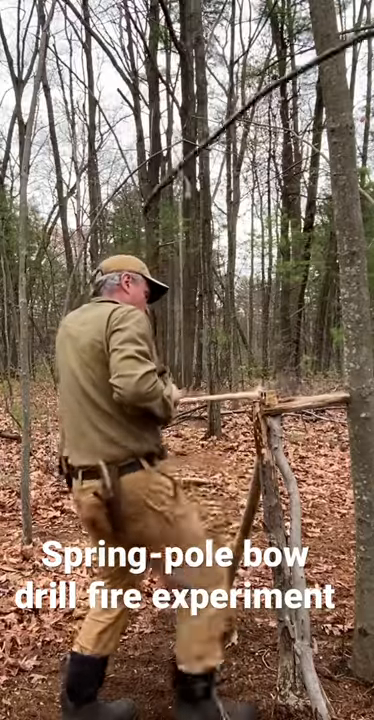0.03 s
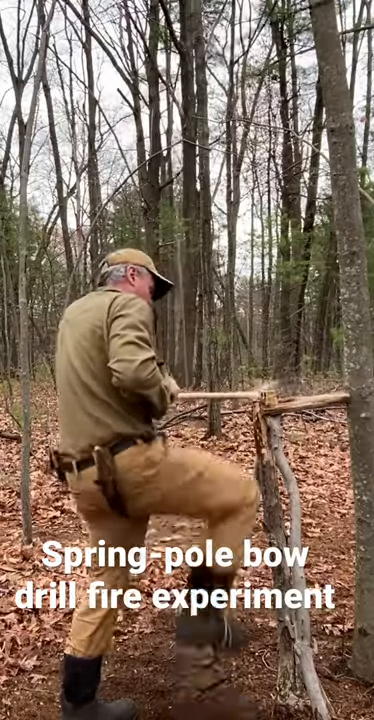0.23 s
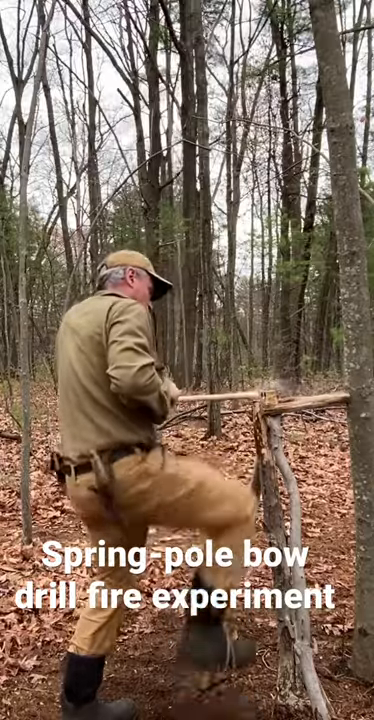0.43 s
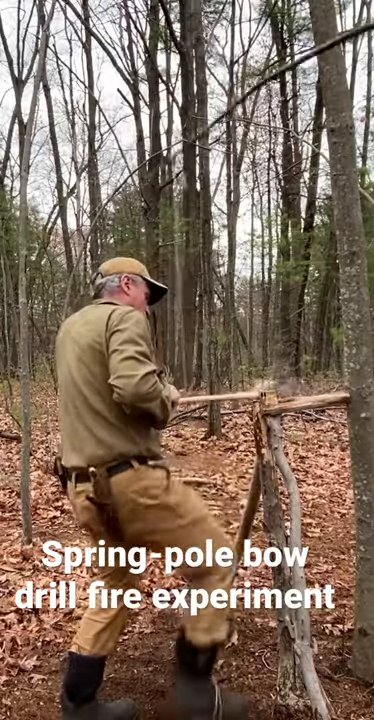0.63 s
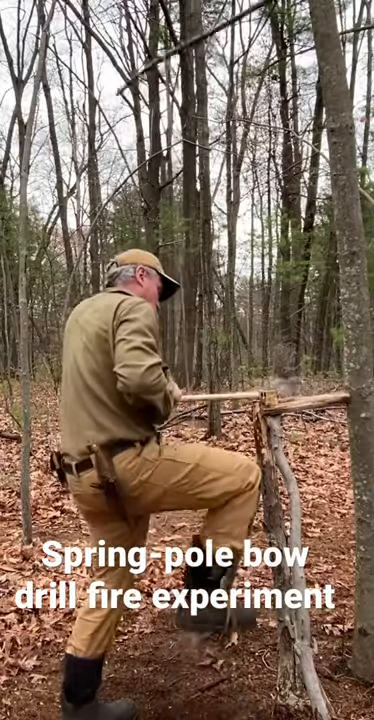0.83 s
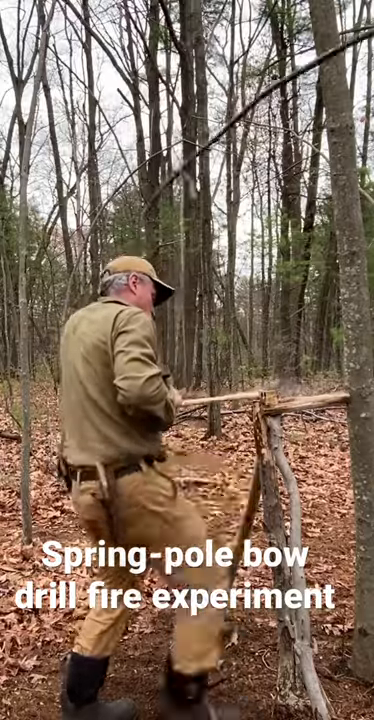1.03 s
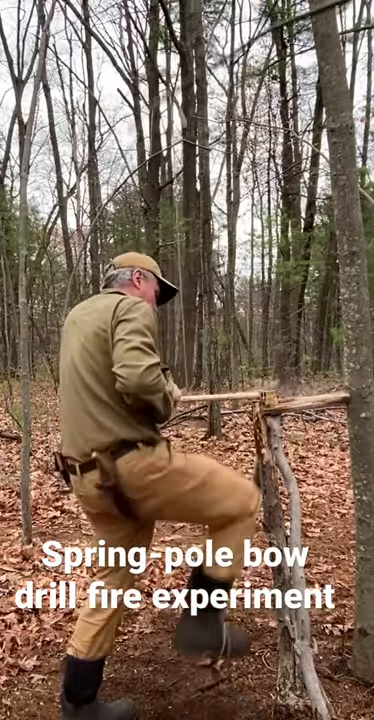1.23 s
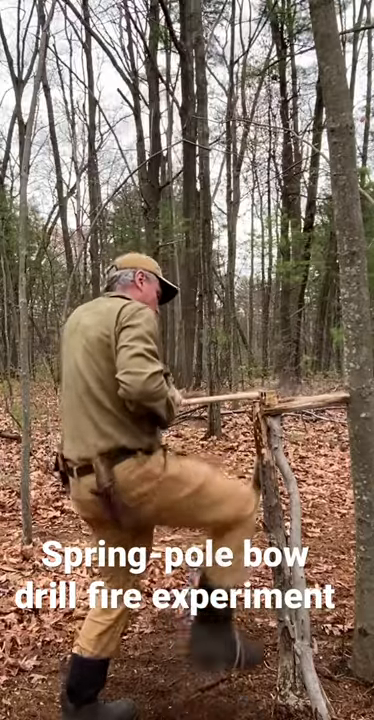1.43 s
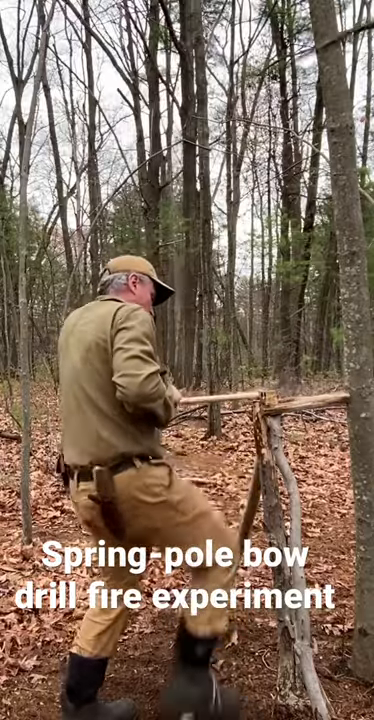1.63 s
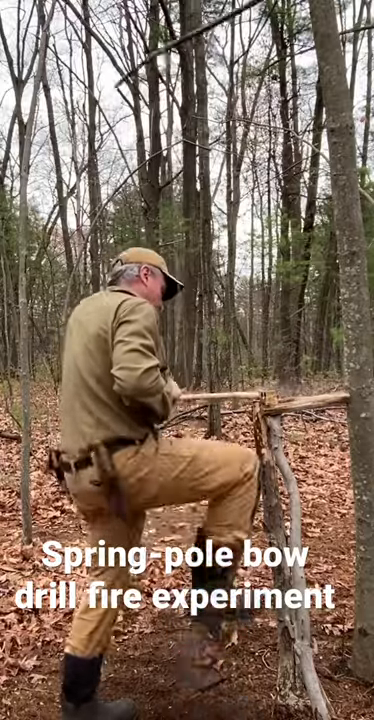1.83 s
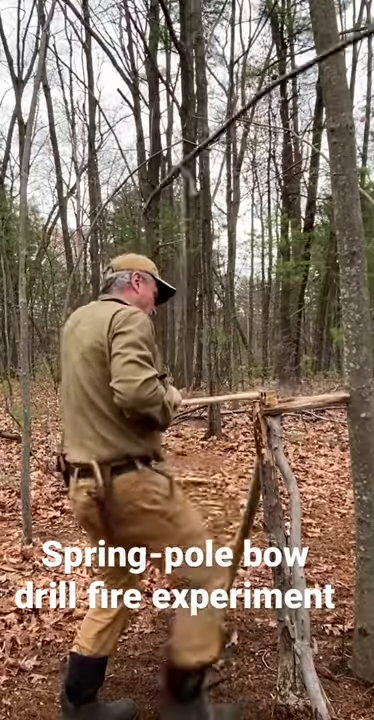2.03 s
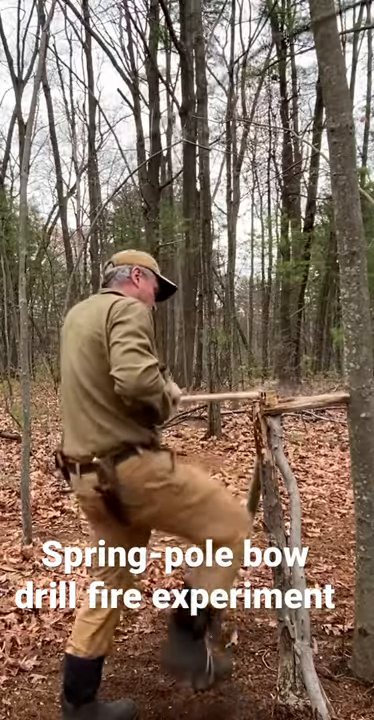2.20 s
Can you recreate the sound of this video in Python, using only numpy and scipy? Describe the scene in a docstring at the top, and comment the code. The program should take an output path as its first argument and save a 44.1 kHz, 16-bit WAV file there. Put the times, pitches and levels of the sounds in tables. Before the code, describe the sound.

Rhythmic dry wood-on-wood squeaks with hiss, cord ticks and soft boot thuds in quiet woods

```python
"""Nine short squeaks of wood on wood, each in a hiss, with small clicks and soft thuds over a far low hum.
A wooden spindle, spun back and forth by a foot-driven cord, rubs against a board in a wood.
Squeaks are stacks of unsteady partials (tones near whole or half multiples of the slip rate) with grit.
Hiss, cord ticks and the wash of traffic and trees are shaped noise; boot thuds are short falling tones.
The traffic hum is two wavering tones with a narrow band of rumble."""
import sys
import numpy as np
from scipy import signal
from scipy.fft import rfft, irfft
from scipy.io import wavfile
from scipy.ndimage import uniform_filter1d

SR = 44100
rng = np.random.default_rng(int(sys.argv[2]) if len(sys.argv) > 2 else 0)


def dump(signal):
    """Clip the signal to [-1, 1] and save it as 16-bit WAV at the path in sys.argv[1]."""
    limited = np.clip(np.atleast_2d(signal).T, -1, 1)
    pcm = np.round(limited * 32767).astype(np.int16)
    wavfile.write(sys.argv[1], SR, pcm)


N = 99886  # length in samples

# how far the left side leads the right for the hiss and the ticks: f/Hz, lead/rad
TREBLE_PHASE = [(0, -20), (9000, 2), (11800, 0.3), (12800, -2.9), (16400, -2)]


def amp(db):
    """Turn decibels into a plain factor."""
    return 10 ** (np.asarray(db) / 20)


def even(x):
    """Scale a signal to an rms (average strength) of 1."""
    return x / np.sqrt(np.mean(x ** 2) + 1e-20)


def read(points, hz):
    """Look up a table over frequency, with straight lines on a nearly logarithmic scale."""
    f, v = np.transpose(points)
    return np.interp(np.log(hz + 20), np.log(f + 20), v)


def add(mix, s, sound):
    """Add a sound into the mix at s seconds, cutting off what runs past the end."""
    part = mix[round(s * SR):][:len(sound)]
    part += sound[:len(part)]


def wander(n, hz):
    """Smooth random drift of rms 1: noise with everything faster than about hz taken out."""
    low_pass = signal.butter(2, hz, fs=SR, output="sos")
    settle = 2000  # samples for the filter to settle, then dropped
    return even(signal.sosfilt(low_pass, rng.standard_normal(n + settle))[settle:])


def colour(x, points):
    """Shape a sound's spectrum by a table, keeping its rms."""
    y = irfft(rfft(x) * amp(read(points, np.fft.rfftfreq(len(x), 1 / SR))), len(x))
    return even(y) * np.sqrt(np.mean(x ** 2))


def ports(x, phase, pan_db):
    """One source at two microphone ports: a phase lead by frequency and a level difference."""
    turn = np.exp(.5j * read(phase, np.fft.rfftfreq(N, 1 / SR)))
    pair = irfft(rfft(x) * np.array([turn, 1 / turn]), N)
    return pair * amp([[pan_db / 2], [-pan_db / 2]])


def air():
    """Wide wash of distant traffic and trees: noise built in short spectra, with drifting patches."""
    # spectrum shape: f/Hz, level/dB
    spectrum = [(15, -54), (35, -38), (49, -26), (145, -1.5), (231, -16.5), (358, -14.5), (555, -13),
                (817, -6.5), (1440, -9), (2180, -15.5), (2700, -18.5), (3300, -24.5), (5120, -29.5),
                (7500, -36), (9270, -47.5), (12000, -53.5), (16000, -68)]
    # left-right likeness: f/Hz, likeness (0 to 1)
    likeness = [(30, 0.33), (150, 0.77), (300, 0.31), (600, 0.36), (1200, .5), (2500, 0.22), (5000, 0.17),
                (10000, 1)]
    # left ahead of right: f/Hz, lead/rad
    lead = [(0, 31), (130, -1), (300, 0.56), (650, 2.5), (1400, 2.15), (2500, .5), (5800, 2), (9000, 1.5)]
    level_db, pan_db = -35.5, 0.73
    patch_db, swell_db = 1.24, .4  # rms of the level changes
    size, hop = 2048, 512  # samples
    frames, hz = N // hop + 5, np.fft.rfftfreq(size, 1 / SR)
    a, b, c, d, patch = rng.standard_normal((frames, size // 2 + 1, 5)).T
    # patches: neighbouring frequencies and moments rise and fall together
    patch = even(uniform_filter1d(uniform_filter1d(patch, 20, 0), 6, 1))
    swell = wander(frames, 1670)  # one value per frame, so really about 3.3 Hz
    same = np.clip(read(likeness, hz), 0, 1)[:, None]
    left = a + 1j * b
    right = same * left + np.sqrt(1 - same ** 2) * (c + 1j * d)
    right = right * np.exp(-1j * read(lead, hz))[:, None]
    level = read(spectrum, hz)[:, None] + patch_db * patch + swell_db * swell
    spectra = np.array([left, right]) * amp(level)
    wash = signal.istft(spectra, nperseg=size, noverlap=size - hop)[1][:, :N]
    return amp(level_db) * even(wash) * amp([[pan_db / 2], [-pan_db / 2]])


def hum():
    """Two sagging engine tones that waver in level, and a lumpy narrow-band rumble under them."""
    # lower engine tone: t/s, f/Hz, level/dB
    low_tone = [(0.04, 132, -37.5), (0.09, 132.7, -33.5), (0.3, 132, -45), (0.49, 131.6, -32),
                (0.85, 130.8, -42.5), (1.07, 130.1, -38), (1.09, 129.2, -44), (1.1, 130.4, -36.5),
                (1.22, 127.7, -36.5), (1.54, 128.4, -37.5), (1.61, 129.5, -41), (1.96, 128.4, -36),
                (1.96, 128.4, -68), (1.98, 128, -36), (2.02, 126.8, -45.5), (2.22, 126.6, -41.5)]
    # higher engine tone: t/s, f/Hz, level/dB
    high_tone = [(0.04, 177, -41), (0.05, 183.6, -41.5), (0.32, 181.6, -50.5), (0.5, 181.1, -45.5),
                 (0.87, 180.5, -54.5), (1.0, 177.8, -47.5), (2.0, 175.1, -52), (2.02, 174.2, -58),
                 (2.22, 175.7, -59)]
    # rumble before a 0.5 dB lift: t/s, level/dB
    throb = [(0.04, -36), (0.35, -39.5), (0.42, -46), (0.5, -32), (0.54, -55), (0.56, -40.5), (1.13, -38),
             (1.27, -44.5), (1.33, -36), (1.43, -40.5), (1.59, -36), (1.73, -43), (1.76, -37), (1.85, -42),
             (1.88, -38.5), (2.22, -40.5)]
    throb_hz, throb_width_hz = 71, 48.6
    right_lead_rad, waver_db, waver_hz = 1, 1.5, 23.4
    t, out = np.arange(N) / SR, np.zeros((2, N))
    for curve in (low_tone, high_tone):
        s, hz, db = np.transpose(curve)
        turn = 2 * np.pi * (np.cumsum(np.interp(t, s, hz)) / SR + rng.random())
        level = np.interp(t, s, db) + waver_db * wander(N, waver_hz)
        out += np.sqrt(2) * amp(level) * np.sin(turn + np.array([[0], [right_lead_rad]]))
    edges = [throb_hz - throb_width_hz / 2, throb_hz + throb_width_hz / 2]
    band = signal.butter(3, edges, "band", fs=SR, output="sos")
    settle = 9000  # samples for the filter to settle
    rumble = even(signal.sosfilt(band, rng.standard_normal(N + settle))[settle:])
    rumble_level = np.interp(t, *np.transpose(throb)) + 0.5
    return out + rumble * amp(rumble_level) * amp([[.7], [-.7]])  # left a little louder


def rub():
    """Grainy hiss of wood and cord: noise in random grains that swells and sinks with each stroke."""
    # strokes of the cord: start t/s, fastest t/s, end t/s, hiss level/dB
    # (the fourth end lies before its fastest moment, so that hiss breaks off at its peak)
    strokes = [(0.003, 0.115, 0.29, -54), (0.305, 0.442, 0.53, -52.5), (0.556, 0.616, 0.84, -56.5),
               (0.815, 0.942, 0.8, -50), (1.052, 1.132, 1.28, -54.5), (1.3, 1.45, 1.525, -51.5),
               (1.567, 1.627, 1.73, -54), (1.789, 1.963, 2, -51), (2.068, 2.12, 2.293, -53.5)]
    # hiss spectrum shape: f/Hz, level/dB
    hiss_colour = [(300, -23), (1500, -4), (5000, -4.5), (8000, -9), (9200, -12), (10500, -3), (12200, -12),
                   (13300, -16), (14800, -8), (15700, -16), (16400, -35)]
    depth_db, bend = 23.5, 1.82  # drop at a stroke's start and end, and curve of the swell
    grain_db, grains_per_s = 1.6, 3000
    same = 0.93  # share of power common to left and right
    noise, t = rng.standard_normal((3, N)), np.arange(N) / SR
    grain_levels = amp(grain_db * rng.exponential(1, N // 8))
    grains = even(grain_levels[(t * grains_per_s).astype(int)])
    near, left, right = (colour(x * grains, hiss_colour) for x in noise)
    pair = np.sqrt(same) * ports(near, TREBLE_PHASE, 0)
    pair = pair + np.sqrt(1 - same) * np.array([left, right])
    swell = np.zeros(N)
    for start, top, end, db in strokes:
        # 0 at the fastest moment, 1 at start and end, growing beyond them
        away = np.interp(t, [start - 1, start, top, end, end + 1], [9, 1, 0, 1, 9])
        swell += amp(db - depth_db * away ** bend)
    return pair * swell


def squeak(curve, upper, halves, rasp_db):
    """Stick-slip at an unsteady rate with grit; strong-weak slips add the half-rate partials."""
    # grit spectrum shape: f/Hz, level/dB
    rasp_colour = [(400, -12), (1000, -4), (2500, 0), (5000, -8), (8000, -22), (16000, -50)]
    jitter, jitter_hz = .016, 260  # rms share of the slip rate, and its speed limit
    flutter_db, flutter_hz = 1.6, 190  # grows with the root of the partial's order
    drift_turns, drift_hz = .045, 60  # each partial slides a little against the others
    bright_at_db, bright_slope = -32, .2  # harder slips are brighter
    edge_s = 0.0047  # fade at either end
    s, hz, first, second, half, under = np.transpose(curve)
    t = np.arange(s[0], s[-1], 1 / SR)
    rate = np.interp(t, s, hz) * (1 + jitter * wander(len(t), jitter_hz))
    turns = np.cumsum(rate) / SR
    # partials as (multiple of the slip rate, level in dB at each point of the curve)
    parts = [(1, first), (2, second), (1.5, half), (.5, under)]
    bright = second + bright_slope * (second - bright_at_db)
    parts += [(k + 3, bright + db) for k, db in enumerate(upper)]
    parts += [(k + 2.5, half + db) for k, db in enumerate(halves)]
    out = np.zeros(len(t))
    for k, db in parts:
        level = np.interp(t, s, db) + flutter_db * np.sqrt(k) * wander(len(t), flutter_hz)
        phase = k * turns + rng.random() + drift_turns * wander(len(t), drift_hz)
        out += amp(level) * np.cos(2 * np.pi * phase)
    bursts = np.exp(-(turns / 2 % 1) / 0.18)  # a burst of grit at every second slip
    grit = even(colour(rng.standard_normal(len(t)) * bursts, rasp_colour))
    out += grit * amp(rasp_db + np.interp(t, s, second))
    fade = np.clip(np.minimum(t - s[0], s[-1] - t) / edge_s, 0, 1)
    return s[0], np.sqrt(2) * out * fade


def spindle():
    """All squeaks, with short scattered echoes off trunks and ground made of sparse random taps."""
    # one curve per squeak: t/s, slip rate f/Hz, then level/dB of partials 1, 2, 1.5 and 0.5
    curves = [
        [(0.1, 1115, -32, -44, -50, -36), (0.114, 1050, -48, -39, -39, -39), (0.124, 942, -31, -33.5, -52, -38),
         (0.13, 959, -32.5, -38.5, -41, -49), (0.15, 1020, -54, -36, -37, -36.5),
         (0.162, 990, -34.5, -39, -35.5, -36), (0.174, 1047, -44, -54, -48, -33),
         (0.184, 1129, -54, -40, -52, -33.5), (0.198, 1105, -36, -51, -35.5, -38),
         (0.208, 1210, -46, -46, -49, -38), (0.22, 1160, -49, -57, -59, -48)],
        [(0.37, 1166, -38.5, -55, -58, -64), (0.372, 1141, -43, -51, -79, -80),
         (0.376, 1154, -43, -43, -64, -66), (0.406, 1187, -32.5, -34, -34, -50),
         (0.416, 1283, -54, -48, -36, -36), (0.422, 1310, -41, -52, -33, -43),
         (0.432, 1304, -35, -32, -30.5, -38), (0.44, 1360, -33, -41, -40, -43),
         (0.45, 1276, -46, -56, -30.5, -43), (0.466, 1342, -37, -36.5, -40, -44),
         (0.48, 1310, -43, -78, -56, -60)],
        [(0.646, 1246, -46, -55, -56, -56), (0.65, 1276, -37, -50, -64, -66),
         (0.658, 1230, -34, -34.5, -64, -65), (0.662, 1190, -50, -41, -63, -52),
         (0.668, 1255, -44, -52, -66, -54)],
        [(0.892, 1268, -23, -49, -49, -61), (0.898, 1280, -31.5, -48, -50, -65),
         (0.904, 1266, -33, -35.5, -72, -66), (0.912, 1266, -29.5, -25.5, -60, -64),
         (0.924, 1327, -27, -34, -66, -57), (0.932, 1365, -31, -30.5, -59, -60),
         (0.938, 1325, -30, -29, -49, -62), (0.942, 1302, -32, -28, -50, -60),
         (0.956, 1323, -27.5, -35, -48, -64), (0.964, 1340, -28.5, -33.5, -49, -63),
         (0.972, 1360, -47, -52, -51, -56)],
        [(1.13, 1266, -41, -43, -60, -58), (1.138, 1240, -41, -31.5, -62, -62),
         (1.146, 1233, -39, -36.5, -64, -55), (1.15, 1205, -32.5, -31.5, -63, -72),
         (1.156, 1208, -31.5, -36, -58, -57), (1.16, 1236, -40, -41, -67, -59),
         (1.162, 1266, -43, -38, -85, -60), (1.164, 1236, -31, -33, -62, -63), (1.17, 1230, -50, -64, -52, -59)],
        [(1.405, 1332, -32, -55, -72, -69), (1.415, 1385, -31.5, -39, -62, -53),
         (1.425, 1344, -25, -41, -56, -63), (1.431, 1328, -35, -34.5, -54, -59),
         (1.447, 1364, -27.5, -35.5, -64, -57), (1.453, 1376, -33, -39, -65, -59),
         (1.459, 1390, -38, -41, -67, -75), (1.465, 1365, -38, -49, -59, -62),
         (1.471, 1400, -38, -57, -70, -67), (1.475, 1375, -46, -58, -67, -57)],
        [(1.625, 1190, -30, -62, -53, -57), (1.633, 1158, -39, -32.5, -70, -59),
         (1.637, 1154, -39, -32.5, -57, -55), (1.641, 1137, -34, -45, -64, -63),
         (1.643, 1190, -46, -33, -56, -69), (1.647, 1178, -33, -30.5, -69, -57),
         (1.655, 1169, -38, -39, -65, -59), (1.663, 1209, -36, -50, -54, -54),
         (1.673, 1228, -41, -42, -65, -49), (1.683, 1167, -37, -46, -53, -52),
         (1.695, 1140, -38, -43, -54, -60)],
        [(1.897, 1231, -35, -40, -55, -61), (1.921, 1302, -29.5, -32.5, -52, -46),
         (1.933, 1295, -32, -29.5, -76, -49), (1.941, 1348, -29, -40, -60, -48),
         (1.951, 1351, -29.5, -29, -61, -54), (1.963, 1336, -30, -41, -57, -53),
         (1.967, 1292, -34, -32.5, -57, -68), (1.971, 1366, -30, -33.5, -56, -54),
         (1.979, 1388, -36.5, -49, -57, -48), (1.985, 1405, -36, -67, -68, -52),
         (1.99, 1406, -49, -59, -57, -53)],
        [(2.113, 1205, -48, -32, -54, -58), (2.119, 1160, -37, -26.5, -58, -37),
         (2.125, 1154, -37, -37, -56, -73), (2.129, 1127, -34.5, -31.5, -57, -54),
         (2.145, 1201, -38, -39.5, -42, -72), (2.169, 1155, -31.5, -29.5, -46, -41),
         (2.179, 1262, -37, -41, -44, -51), (2.185, 1218, -36, -61, -48, -71),
         (2.189, 1237, -34, -41, -54, -63), (2.197, 1263, -39, -36.5, -56, -65),
         (2.21, 1280, -35, -56, -30.5, -66)],
    ]
    # one row per squeak, partials 3, 4, 5, 6: level/dB against the brightened second partial
    uppers = [(-6, -15, -30, -18.5), (-11.5, -19, -20, -29), (-14, -25, -24, -23), (-12, -20, -26, -46),
              (-17, -15.5, -30, -32), (-19, -25, -29, -43), (-12, -14, -25, -26), (-8.5, -21.5, -26.5, -35),
              (-11.5, -12, -22, -23)]
    # one row per squeak, partials 2.5, 3.5, 4.5: level/dB against partial 1.5
    half_rates = [(-6.5, -14, -19), (-10, -17.5, -31), (-5, -13, -15), (-5, -10, -15), (-7, -14, -15),
                  (-5, -12, -15), (-3, -8, -15), (-16, -3, -12), (-4, -12, -21)]
    # one value per squeak, grit: level/dB against the second partial
    rasps = [-12, -12, -20, -18, -20, -19, -20, -19, -19]
    # left ahead of right: f/Hz, lead/rad
    lead = [(0, 3.4), (600, 0.71), (1300, 0.87), (1900, 0.13), (2600, 0.8), (4000, 1), (5500, 1.76),
            (8000, 1.27)]
    pan_db, echo_db, echo_t60_s = 0.7, -11, .08  # t60: time for the echoes to fall 60 dB
    direct = np.zeros(N)
    for row in zip(curves, uppers, half_rates, rasps):
        add(direct, *squeak(*row))
    t = np.arange(4000) / SR
    hits = rng.random((2, 4000)) < .05  # keep about one tap in twenty
    taps = rng.standard_normal((2, 4000)) * hits * amp(-60 * t / echo_t60_s) * (t > .002)
    echo = signal.fftconvolve(direct[None], taps / np.linalg.norm(taps[0]), axes=1)[:, :N]
    return ports(direct, lead, pan_db) + amp(echo_db) * echo


def ticks():
    """Tiny bright double snaps of the cord: bursts of noise, each with a faint fizz after it."""
    # main snaps: t/s, level/dB of the noise before its envelope
    snaps = [(0.2517, -50.5), (0.2698, -70), (0.6, -55), (0.613, -47), (0.6792, -44), (0.941, -38),
             (1.0495, -33), (1.0854, -47.5), (1.1766, -45), (1.439, -41), (1.5646, -34.5), (1.6061, -50),
             (1.6815, -44.5), (2.112, -42)]
    # snap spectrum shape: f/Hz, level/dB
    snap_colour = [(1000, -33), (4000, -8.5), (7000, -10), (9000, -5), (11000, -0.5), (12500, -6.5),
                   (13500, -18), (15000, -6), (15800, -10), (16400, -30)]
    rise_s, fall_s, tail_db, tail_s = 0.00065, 0.00078, -12, 0.01
    lead_s, lead_db = 0.0011, -13.5  # a weaker snap comes just before the main one
    out, t = np.zeros(N), np.arange(1500) / SR
    late = np.maximum(t - rise_s, 0)
    fall = np.exp(-late / fall_s) + amp(tail_db) * np.exp(-late / tail_s)
    snap = np.minimum(t / rise_s, 1) * fall
    for (s, db), noise in zip(snaps, rng.standard_normal((len(snaps), 2, 1500))):
        add(out, s - lead_s, amp(db + lead_db) * snap ** 2 * colour(noise[0], snap_colour))
        add(out, s, amp(db) * snap * colour(noise[1], snap_colour))
    return out


def thuds():
    """The boot meets the ground at the end of each down-stroke: a short tone that slides down."""
    # thuds: t/s, level/dB before the envelope, middle of the slide f/Hz
    hits = [(0.467, -34.5, 264), (.955, -28.5, 280), (1.464, -33, 266), (1.966, -27.5, 267)]
    rise_s, fall_s, slide_hz = 0.0092, 0.0096, 170
    out, t = np.zeros(N), np.arange(3000) / SR
    fall = np.exp(-t / fall_s)
    envelope = (1 - np.exp(-t / rise_s)) * fall
    for s, db, hz in hits:
        pitch = hz - slide_hz / 2 + slide_hz * fall
        add(out, s, amp(db) * envelope * 2 * np.sin(2 * np.pi * np.cumsum(pitch) / SR))
    return out


def scene():
    """Add up all layers in stereo; the thuds are the same on both sides."""
    return air() + hum() + rub() + spindle() + ports(ticks(), TREBLE_PHASE, 0) + thuds()


def record(dry):
    """The microphone loses the deepest bass; then a band limit takes off the top treble."""
    low_cut_hz, edge_hz = 41, 16250
    bass_cut = signal.butter(2, low_cut_hz, "high", fs=SR, output="sos")
    thin = signal.sosfilt(bass_cut, dry)
    band_limit = signal.firwin(511, edge_hz, window=("kaiser", 9), fs=SR)
    return signal.oaconvolve(thin, band_limit[None], "same")


dry = scene()
out = record(dry)
dump(out)
```